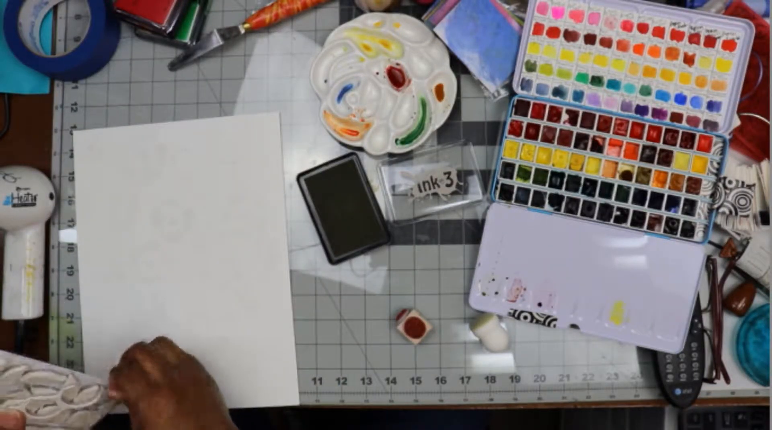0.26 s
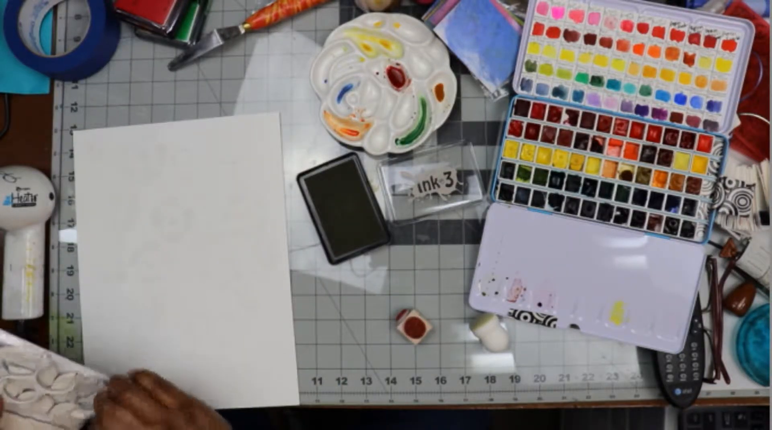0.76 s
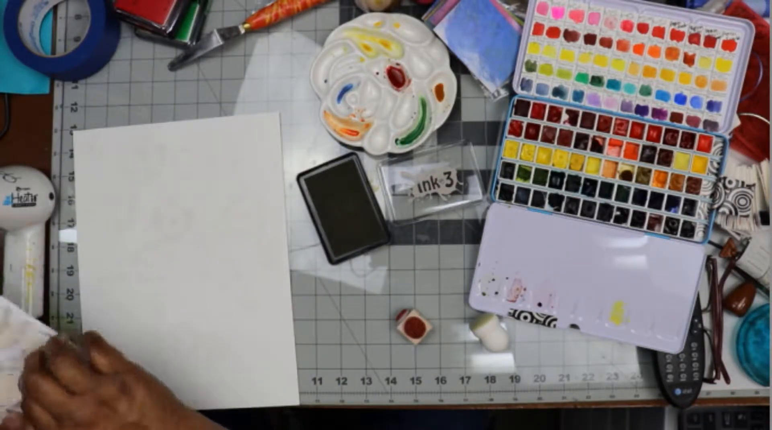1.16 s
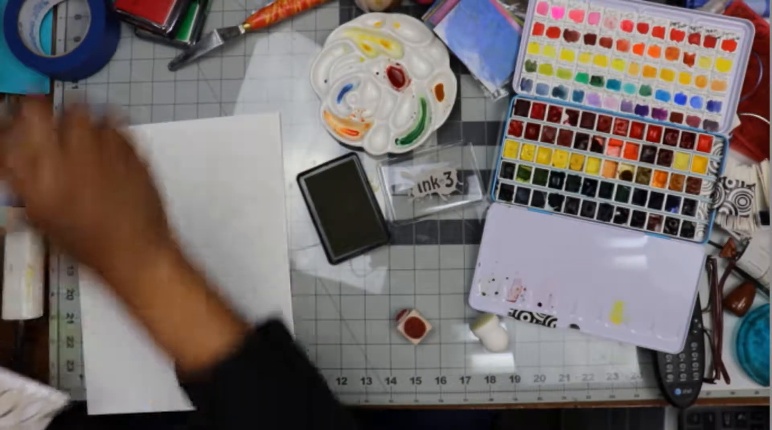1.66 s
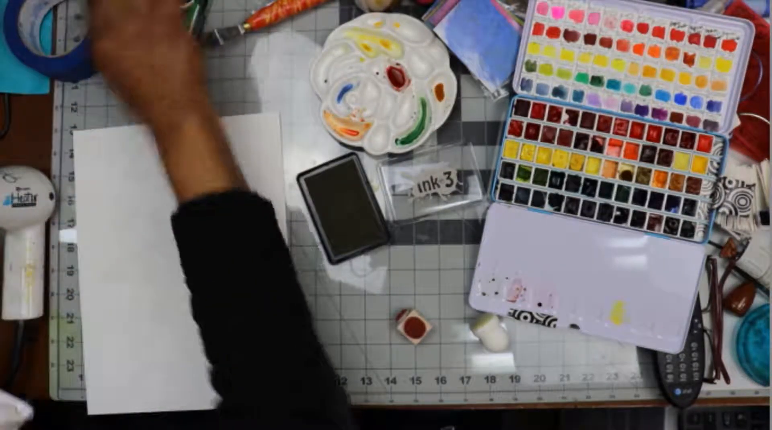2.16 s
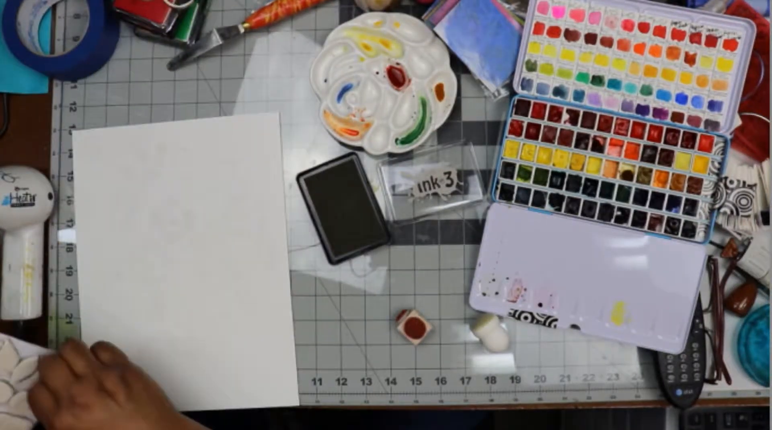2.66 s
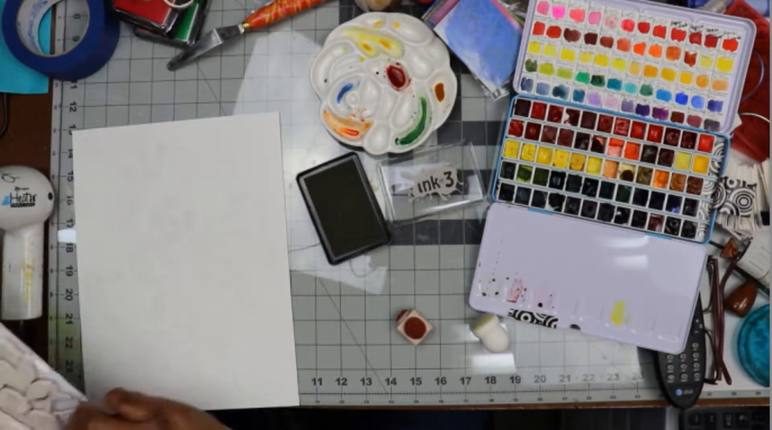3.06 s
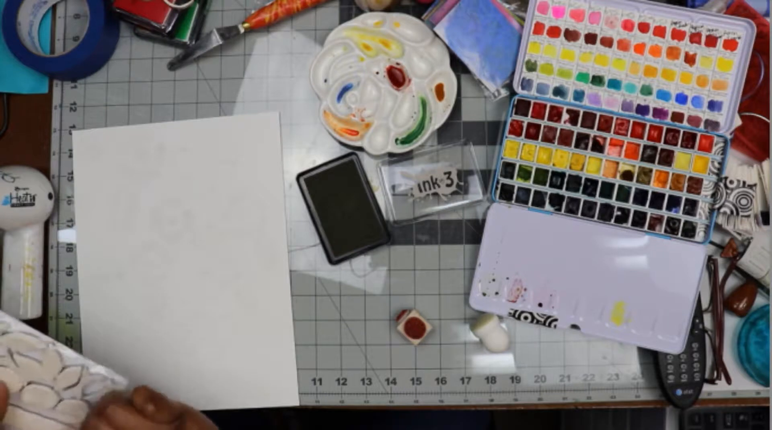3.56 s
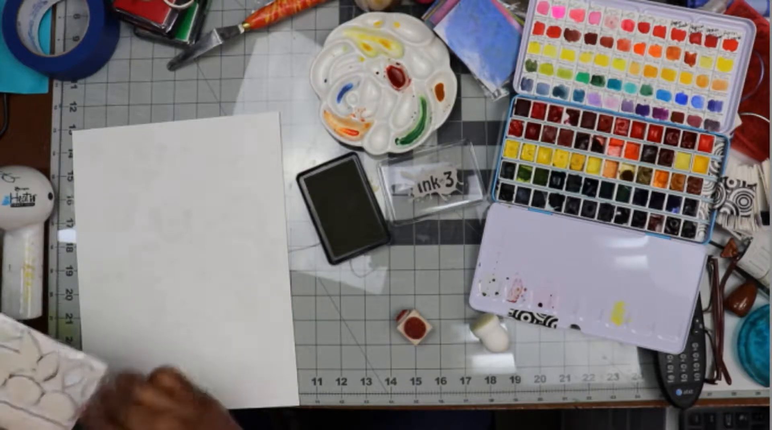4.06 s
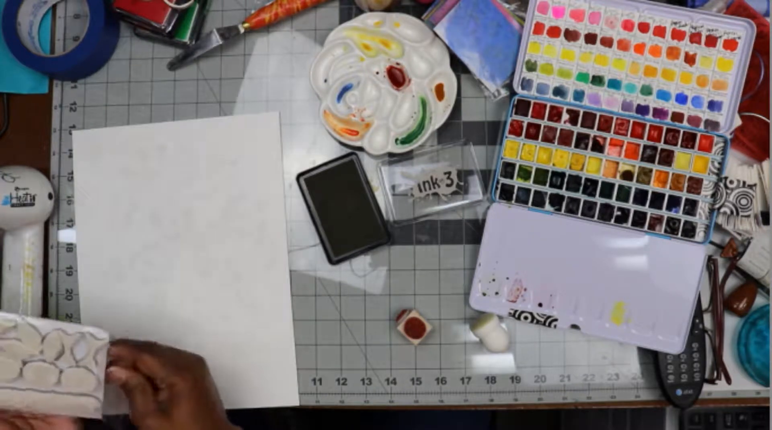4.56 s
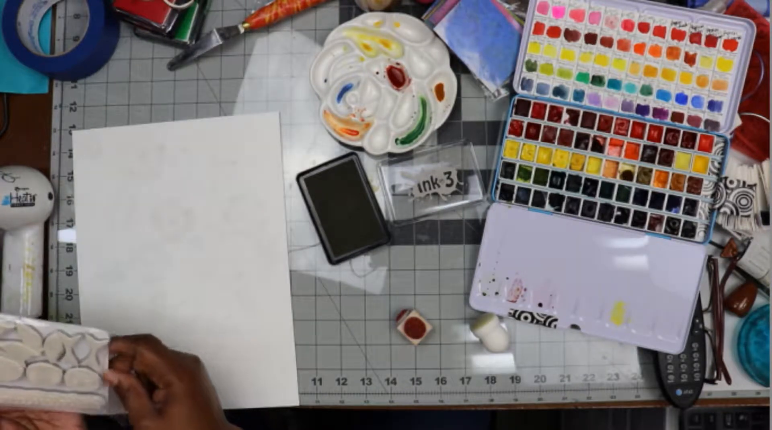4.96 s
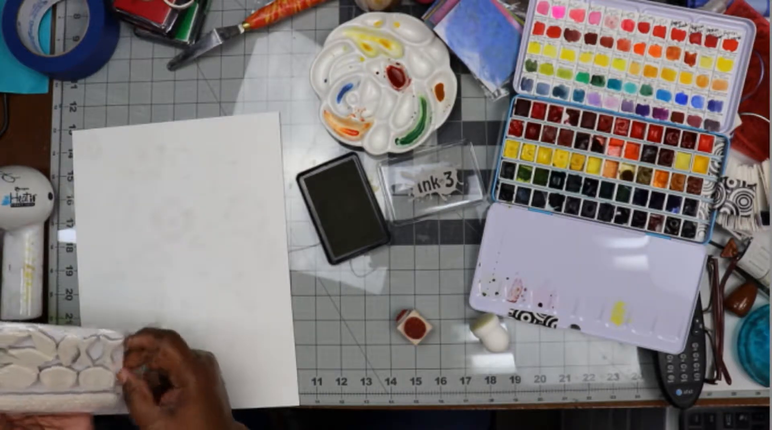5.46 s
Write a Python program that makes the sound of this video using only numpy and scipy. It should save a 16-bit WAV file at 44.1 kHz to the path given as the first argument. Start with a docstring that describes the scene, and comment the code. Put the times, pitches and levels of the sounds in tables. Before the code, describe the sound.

Close up at a desk, a plastic sleeve holding rubber stamps crackles briefly as it is flexed. Light ticks and a brief scratch follow, then a lull. The sleeve then snaps and pops hollowly in two bursts about a second apart, and the handling trails off in faint scratches and ticks. A quiet hum and hiss run underneath in the small, dry room, heard almost in mono.

```python
"""A sheet of rubber stamps in its plastic sleeve, bent and picked at by two hands at a desk.
The plastic buckles in sharp snaps and hollow pops and rubs in short scratches; its resonances
shift with each new bend. Heard up close on one near-mono microphone in a small, dry room,
with a low hum and a soft hiss underneath."""
import sys
import numpy as np
from scipy import signal
from scipy.fft import rfft, irfft
from scipy.io import wavfile

SR = 44100
rng = np.random.default_rng(int(sys.argv[2]) if len(sys.argv) > 2 else 0)


def dump_mix(stems):
    """Bounce the given channels to the path in sys.argv[1] as a 16-bit WAV at rate SR."""
    frames = np.atleast_2d(stems).T  # one column per channel
    limited = np.clip(frames, -1, 1)  # hard clip at full scale
    pcm = np.round(limited * 32767).astype(np.int16)
    wavfile.write(sys.argv[1], SR, pcm)


N = 251622
EDGE_HZ = 9230  # top of the microphone's band
HZ = np.fft.rfftfreq(4096, 1 / SR)
# the sheet buckles: start_s, snap_db, crackle_length_s, pop_db, pop_pitch_hz, pop_t60_s
BUCKLES = [(0.3025, -14.5, 0.0011, -38.5, 320, 0.027), (0.3566, -25, 0.0037, -31, 1910, 0.018),
           (0.3581, -26, 0.0011, -36, 1110, 0.019), (0.3851, -19.5, 0.0022, -46, 1770, 0.025),
           (0.3970, -25.5, 0.012, -49, 1130, 0.05), (0.4371, -34, 0, -43, 1360, 0.045),
           (0.4538, -17, 0, -35, 1410, 0.021), (1.1934, -32.5, 0, -33, 2180, 0.012),
           (2.7809, -16.5, 0, -15, 1152, 0.019), (2.7828, -19.5, 0.0039, -15.5, 1020, 0.016),
           (2.7883, -19.5, 0.01, -26.5, 1259, 0.037), (2.8034, -16, 0.0021, -29.5, 1240, 0.017),
           (2.8078, -17.5, 0.003, -25, 1310, 0.021), (2.8244, -28, 0, -36, 1204, 0.031),
           (3.0178, -28.5, 0, -36.5, 1176, 0.021), (3.0301, -23.5, 0.0009, -58, 1170, .03),
           (3.5263, -29.5, 0.006, -35.5, 1790, .02), (3.5359, -23.5, 0.0022, -42, 1790, 0.028),
           (3.5414, -22, 0.00029, -26, 1647, 0.021), (3.616, -16.5, 0.008, -28.5, 2107, 0.04),
           (3.6324, -31, 0, -31.5, 1746, 0.045), (3.6460, -27, 0.019, -38.5, 1074, 0.077)]


def amp(db):
    """Decibels to gain."""
    return 10 ** (np.asarray(db) / 20)


def unit_rms(x):
    """Scales to an rms of one."""
    return x / np.sqrt(np.mean(x ** 2) + 1e-20)


def spectrum(points, hz):
    """Gain at hz, joining (frequency_hz, level_db) points on a log-frequency axis."""
    f, db = np.transpose(points)
    return amp(np.interp(np.log(hz + 1), np.log(f + 1), db))


def add(mix, start_s, sound):
    """Mixes a sound in at start_s."""
    part = mix[max(round(start_s * SR), 0):][:len(sound)]
    part += sound[:len(part)]


def impulse_response(gain):
    """The unit-energy ring of a magnitude response, sharp at its start."""
    log_gain = np.log(np.r_[gain, gain[-2:0:-1]] + 1e-6)
    ring = np.fft.ifft(np.exp(np.conj(signal.hilbert(log_gain)))).real
    return ring / np.linalg.norm(ring)


def resonance(hz, width_hz):
    """Magnitude of one steep-sided resonance."""
    return 1 / (1 + (2 * (HZ - hz) / width_hz) ** 2)


def drift(rate_hz):
    """A slow random curve with an rms of one."""
    f = np.fft.rfftfreq(1024, N / SR / 1024)
    coarse = irfft(rfft(rng.standard_normal(1024)) * np.exp(-(f / rate_hz) ** 2))
    return unit_rms(np.interp(np.linspace(0, 1023, N), np.arange(1024), coarse))


def background_dips(fall_s=0.099, recover_s=0.28):
    """The background's gain: it dips briefly, falling fast and recovering slowly."""
    # dips in level: deepest_s, depth_db
    dips = [(2.871, -3.5), (3.69, -11.5)]
    t, level_db = np.arange(N) / SR, 0
    for s, db in dips:
        fall = np.clip(1 + (t - s) / fall_s, 0, 1)
        level_db += db * fall * np.exp(-np.maximum(t - s, 0) / recover_s)
    return amp(level_db)


def room_tone(noise_db=-54.5, flicker_db=1.3, flicker_above_hz=3000, waver=0.014, throb=0.3):
    """Rumble and a hiss whose treble flickers slightly, with a few unsteady lines of hum."""
    # spectrum of the room's noise: frequency_hz, relative_db
    noise_shape = [(20, -54), (108, -25.5), (120, -18), (148, 3.5), (176, -1), (200, -8), (350, -13),
                   (560, -22.5), (800, -20), (1300, -24.5), (2500, -21.5), (3200, -30.5), (7000, -36.5),
                   (8250, -79.5)]
    # lines of hum: pitch_hz, level_db
    hum_lines = [(119, -76), (177.6, -65), (258.4, -73), (274.5, -71.5), (312.2, -75.5), (629.8, -88.5),
                 (942.1, -78)]
    f = np.fft.rfftfreq(N, 1 / SR)
    noise = amp(noise_db) * unit_rms(irfft(rfft(rng.standard_normal(N)) * spectrum(noise_shape, f), N))
    treble = irfft(rfft(noise) * (f > flicker_above_hz), N)
    noise += treble * (amp(flicker_db * drift(rate_hz=9)) - 1)
    hum = 0
    for hz, db in hum_lines:
        turns = np.cumsum(hz * (1 + waver * drift(rate_hz=8))) / SR
        swell = 1 + throb * drift(rate_hz=1.4)
        hum += amp(db) * unit_rms(swell * np.sin(2 * np.pi * turns))
    return noise + hum


def reflections(x, early_t60_s=0.067, rise_s=0.0041, late_db=-30, late_t60_s=0.17, late_hz=3000):
    """Quick reflections off the desk and its clutter, then the room's weak, dull tail."""
    t = np.arange(SR // 3) / SR
    early, late = rng.standard_normal((2, len(t)))
    late = signal.lfilter(*signal.butter(1, late_hz, fs=SR), late)
    tail = early * amp(-60 * t / early_t60_s) + late * amp(late_db - 60 * t / late_t60_s)
    tail *= np.clip(t / rise_s, 0, 1) ** 2
    return signal.oaconvolve(x, tail / np.linalg.norm(tail))[:N]


def creases(per_s=700, level_db=-78, clump_db=5, reach_s=(1.3, 2.35)):
    """Soft clumps of crinkling as the hands work the sheet; none while one reaches across the desk."""
    t = np.arange(N) / SR
    held = (t < reach_s[0]) | (t > reach_s[1])
    crinkles = (rng.random(N) < per_s / SR) * rng.standard_normal(N)
    clumps = np.minimum(drift(rate_hz=18), 1.5)
    return held * unit_rms(crinkles) * amp(level_db + clump_db * clumps)


def rubs(slips_per_s=1600, slip_db=4, hiss=0.58, release_s=0.0031, steady_db=-40, faint_db=-50,
         treble_cut_hz=7500, lead_s=0.024, lead_db=-24, lead_db_per_s=1099.5):
    """Sliding is a run of tiny, uneven slips; returns the direct sound and the room's share."""
    # plastic slides on plastic or under a finger: start_s, length_s, level_db, room_send_db
    strokes = [(0.035, 0.04, -60.5, -12), (0.117, 0.1, -66.5, -14), (.258, 0.035, -63.5, -12.5),
               (0.352, 0.015, -35, -5.5), (0.383, 0.025, -41, 7), (0.88, 0.064, -63.5, -14),
               (0.99, 0.12, -66, -21.5), (1.1906, 0.0097, -30, -21), (1.253, 0.041, -62.5, -2),
               (2.353, 0.076, -59, -16), (2.611, 0.1, -61, -12), (2.737, .04, -56, -9.5),
               (2.772, 0.051, -35.5, -12.5), (3.0134, 0.011, -32.5, -15), (3.103, 0.036, -58.5, -11),
               (3.34, 0.041, -68, -15), (3.491, 0.11, -59.5, -11), (3.524, 0.016, -30.5, -2.5),
               (3.601, 0.054, -41, 4), (3.905, 0.042, -66.5, -16.5), (4.174, 0.034, -68, -11),
               (4.322, 0.033, -68, -12), (4.379, 0.055, -64, -9), (5.394, 0.063, -63, -16),
               (5.563, 0.06, -67, -8), (5.651, 0.032, -67, -11)]
    slips = (rng.random(N) < slips_per_s / SR) * rng.standard_normal(N)
    slips = np.sign(slips) * amp(slip_db * np.minimum(rng.exponential(1, N), 3))
    grain = unit_rms(unit_rms(slips) + hiss * rng.standard_normal(N))
    cut_grain = signal.sosfilt(signal.butter(8, treble_cut_hz, fs=SR, output="sos"), grain)
    t, direct, send = np.arange(N) / SR, np.zeros(N), np.zeros(N)
    unsteady = drift(rate_hz=55)
    for s, length, db, room_db in strokes:
        attack = np.clip((t - s) / (0.0014 + 0.07 * length), 0, 1)  # long strokes gather speed slowly
        release = np.exp(-np.clip((t - s - length) / release_s, 0, 40))
        # faint strokes flutter unevenly and have their top treble cut
        flutter_db = 0.15 * max(steady_db - db, 0) * (unsteady - 0.3)
        stroke = amp(db + flutter_db) * attack * release * (cut_grain if db < faint_db else grain)
        direct += stroke
        send += stroke * amp(room_db)
    # friction builds as the sheet is bent towards each buckle
    remaining_s = np.arange(0, lead_s, 1 / SR)[::-1]
    for s, db, *_ in BUCKLES:
        swell = amp(db + lead_db - lead_db_per_s * remaining_s)
        add(direct, s - lead_s, swell * grain[round(s * SR):][:len(swell)])
    return direct, send


def snaps(events, broadband, rattle_db, gain_db, smear_s=0.0022, rise_s=0.0055, t60_s=0.0093):
    """Each snap is a pulse smeared by bending waves, highs first, and a brief rattle of the sleeve."""
    out, t = np.zeros(N), np.arange(len(HZ)) / SR
    fade = np.clip(t / rise_s, 0, 1) ** 2 * amp(-60 * t / t60_s)
    share = amp(rattle_db)
    for s, db, brightest_hz in events:
        delay_s = smear_s * rng.uniform(0.8, 1.2) * (1 - np.sqrt(np.minimum(HZ / EDGE_HZ, 1)))
        pulse = irfft(np.exp(-2j * np.pi * np.cumsum(delay_s) * HZ[1]))[:len(t)]
        rattle = rng.standard_normal(len(t)) * fade
        push = (pulse + share * rattle / np.linalg.norm(rattle)) / np.hypot(1, share)
        ring = impulse_response(broadband + resonance(brightest_hz, width_hz=3000))
        add(out, s, amp(db + gain_db) * signal.fftconvolve(push, ring))
    return out


def sleeve_ticks():
    """A small fold or a fingertip makes the sleeve tick, with no pop."""
    # ticks of the sleeve: start_s, relative_db, brightest_hz
    ticks = [(.0355, -50.5, 3900), (.172, -52.5, 4500), (.186, -56, 4000), (.3810, -28, 4400),
             (.3925, -34, 5000), (.4226, -34, 6500), (0.6225, -46, 6760), (.673, -58.5, 5500),
             (.7118, -50, 4100), (.9026, -56, 4530), (.941, -60, 4500), (1.0355, -52.5, 4500),
             (1.051, -56, 4500), (1.083, -65, 4600), (1.145, -55.5, 4470), (1.916, -47.5, 3010),
             (2.3808, -49.5, 6200), (2.4042, -47.5, 3800), (2.419, -51.5, 3800), (2.5274, -53.5, 4930),
             (2.6187, -53, 4500), (2.6528, -47.5, 3000), (2.7299, -52, 4500), (2.7995, -21.5, 5400),
             (2.817, -30, 2400), (2.8380, -43, 5500), (2.8535, -45.5, 3600), (2.8815, -54, 5500),
             (3.0218, -34, 6000), (3.248, -56, 4525), (3.473, -50, 4220), (3.5725, -44.5, 5000),
             (3.7965, -56.5, 5030), (3.8482, -56.5, 4550), (3.906, -65, 4500), (3.983, -57, 5700),
             (4.084, -48.5, 2970), (4.1212, -48.5, 6200), (4.2607, -59, 4500), (4.3797, -50, 3660),
             (4.408, -48, 1850), (4.8115, -59.5, 4480), (4.8583, -51, 1870), (4.9307, -56.5, 4000),
             (4.9646, -61, 4010), (5.4193, -52, 4720), (5.5585, -43.5, 4750), (5.5689, -44, 4530),
             (5.6025, -50, 5530), (5.6715, -53, 4500)]
    return snaps(ticks, broadband=0.24, rattle_db=-1, gain_db=15)


def hollow_rings(rise_s=0.0025, grip_s=0.031, grip_t60_s=0.04):
    """The bulge rings on in a few clear modes until the fingers' grip damps them."""
    # the deepest flexes: start_s, modes as (pitch_hz, level_db, t60_s)
    flexes = [ (.3025, [(506, -36, 0.032), (1870, -45, .05)]), (2.783, [(947, -35, .09), (1164, -33, 0.1),
              (1400, -31, .13), (1531, -38.5, .11), (1916, -40.5, .12), (2657, -36, .14),
              (3441, -34, .15)]), (3.527, [(1690, -34, 0.079), (3284, -29.5, .07)]),
              (3.542, [(1141, -42, 0.097), (1852, -39, 0.084), (2514, -37.5, .04), (2820, -34.5, .05)]),
              (3.619, [(1150, -41, 0.13), (1308, -38.5, 0.15), (1750, -35.5, 0.13), (1852, -36, .12),
              (2046, -38, 0.1), (2805, -39.5, .1)]), ]
    out, t = np.zeros(N), np.arange(SR // 6) / SR
    attack = (1 - np.exp(-t / rise_s)) ** 2
    grip = amp(-60 * np.maximum(t - grip_s, 0) / grip_t60_s)
    for s, modes in flexes:
        for hz, db, t60 in modes:
            mode = amp(db - 60 * t / t60) * np.sin(2 * np.pi * (hz * t + rng.random()))
            add(out, s, attack * grip * mode)
    return out


def buckle_pops(count=10, spread=0.31, rise_s=0.0014, sag=0.081, sag_s=0.013):
    """Each buckle flips the bulge: low bending modes start together and sag in pitch as it relaxes."""
    out, t = np.zeros(N), np.arange(SR // 6) / SR
    glide = 1 + sag * np.exp(-t / sag_s)
    for s, _, _, db, hz, t60 in BUCKLES:
        jitter, phase = rng.random((2, count, 1))
        offset = 2 * (np.arange(count)[:, None] + jitter) / count - 1  # -1 to 1 across the cluster
        turns = np.cumsum(hz * (1 + spread * offset) * glide, axis=1) / SR
        fade = (1 - np.exp(-t / rise_s)) ** 2 * amp(-60 * t / t60)
        modes = np.exp(-offset ** 2) * np.sin(2 * np.pi * (turns + phase))
        # each pop is cut off below about two thirds of its pitch
        low_cut = signal.butter(2, 0.65 * hz, "high", fs=SR, output="sos")
        pop = signal.sosfilt(low_cut, fade * modes.sum(0))
        add(out, s, amp(db) * pop * np.linalg.norm(fade) / np.linalg.norm(pop))
    return out


def buckle_snaps(brightest_hz=5374, max_folds=12, folds_per_s=170, fold_db=-8.5, fade_db=-7):
    """The sheet buckles with a sharp snap, and smaller folds give way in a dying crackle."""
    events = []
    for s, db, crackle_s, *_ in BUCKLES:
        events.append((s, db, brightest_hz))
        delays_s = (1 + np.arange(max_folds) + rng.uniform(-0.23, 0.3, max_folds)) / folds_per_s
        sizes_db = db + fold_db + 1.5 * rng.standard_normal(max_folds)
        for delay, size in zip(delays_s, sizes_db):
            if delay < crackle_s:
                events.append((s + delay, size + fade_db * delay / crackle_s, brightest_hz))
    return snaps(events, broadband=1.0, rattle_db=-3, gain_db=16)


def sheet(direct, send):
    """Each bend of the sheet has its own reflections and its own midrange and treble resonances."""
    # the tone during each bend: start_s, peaks as (centre_hz, width_hz, level_db)
    # the 60 Hz peak from 1.17 s is heard as a faint low thump under the short scratch
    bends = [ (0, [(450, 340, -11.5), (1910, 170, -10.5), (2840, 190, 1.5), (3490, 550, 5), (4250, 610, 5),
             (4970, 440, -7), (6470, 1200, 1)]), (.345, [(1090, 280, -6.5), (1780, 220, -3.5),
             (3130, 1400, -2.5), (4300, 820, 0.5), (5500, 400, -16), (6520, 890, 5.5)]),
             (.435, [(1420, 260, 2), (2070, 440, -4), (2890, 430, 10), (4960, 1100, 3), (6520, 930, 7.5)]),
             (.55, [(2030, 250, 1), (3360, 1200, -10), (4350, 1300, -9), (5960, 2000, -5.5)]),
             (1.17, [(60, 120, -17), (2015, 210, -5), (2540, 530, -4.5), (3580, 330, 3), (4460, 450, 5.5),
             (5700, 1100, 3), (6970, 340, -3), (7860, 420, -6.5)]), (1.6, [(950, 500, 10), (1696, 500, 7),
             (3120, 500, 4), (4110, 700, 0)]), (2.3, [(1620, 720, -3), (3300, 2400, -2), (4770, 1600, -8.5),
             (6170, 1400, 2), (8000, 900, -12)]), (2.773, [(1135, 395, -3), (1415, 205, 2), (2730, 1430, 0),
             (3390, 260, -1.5), (4850, 170, 6.5), (5000, 140, -4.5), (5550, 760, 5), (6670, 890, 2)]),
             (2.95, [(1172, 220, -4), (2293, 610, -1.5), (3150, 2240, -2.5), (5960, 1140, 1.5)]),
             (3.4, [(1810, 450, 1.5), (2720, 400, 3.5), (3250, 300, 1.5), (4500, 600, -13.5),
             (5560, 1000, 0), (6660, 1030, -4)]), (3.594, [(652, 390, -13), (1202, 440, -5),
             (2090, 323, 3.5), (2850, 1100, -0.5), (5630, 510, 3.5), (6350, 1200, 1)]),
             (3.75, [(1590, 800, -3), (3270, 1370, -4.5), (4540, 1050, -6.5), (6200, 1400, -4)]), ]
    # broad sound of the plastic between the peaks: frequency_hz, level_db
    plastic = [(30, -38.5), (150, -41.5), (600, -41), (1200, -42.5), (2500, -12.5), (5000, -0.5),
               (7300, -7), (8000, -28), (8700, -43), (9400, -47.5)]
    out = np.zeros(N)
    edges = [round(s * SR) for s, _ in bends] + [N]
    for (_, peaks), start, end in zip(bends, edges, edges[1:]):
        peak_power = sum((amp(db) * resonance(hz, width)) ** 2 for hz, width, db in peaks)
        ring = impulse_response(np.sqrt(spectrum(plastic, HZ) ** 2 + peak_power))
        push = reflections(send[start:end])
        add(push, 0, direct[start:end])
        add(out, start / SR, signal.oaconvolve(push, ring))
    return out


def scene(snap_room_db=-8, tick_room_db=-9, rub_room_db=-5, pop_room_db=-9, side_db=-22):
    """The sheet and its reflections sit a hair right of centre, over the room tone."""
    background = room_tone() * background_dips()
    pops, rings = buckle_pops(), hollow_rings()
    scratches, scratch_send = rubs()
    ticks = creases() + sleeve_ticks()
    cracks = buckle_snaps()
    send = amp(snap_room_db) * cracks + amp(tick_room_db) * ticks + amp(rub_room_db) * scratch_send
    mid = sheet(cracks + ticks + scratches, send)
    mid += pops + rings + amp(pop_room_db) * reflections(pops)
    side = amp(side_db) * sheet(np.zeros(N), send)
    pan = amp([[-0.18], [0.18]])
    return pan * np.array([mid + side, mid - side]) + background


def record(dry):
    """The microphone's narrow treble notch and steep band limit."""
    notch_hz, width_hz = 7930, 67
    notched = signal.lfilter(*signal.iirnotch(notch_hz, notch_hz / width_hz, fs=SR), dry)
    low_pass = signal.firwin(301, EDGE_HZ, window=("kaiser", 8), fs=SR)
    return signal.oaconvolve(notched, low_pass[None], "same", axes=1)


dry = scene()
out = record(dry)
dump_mix(out)
```